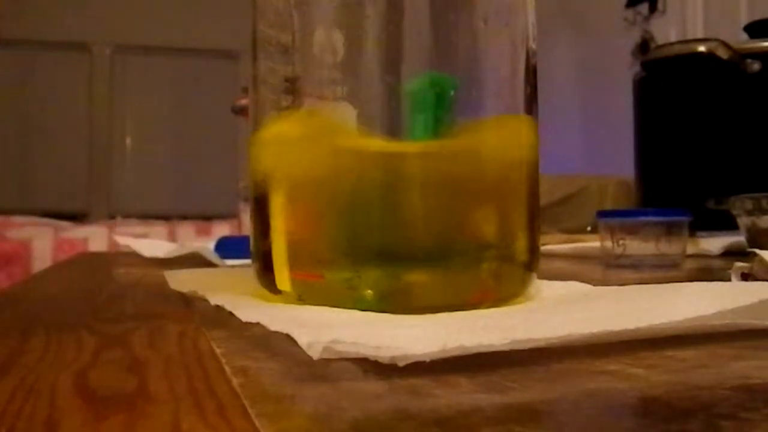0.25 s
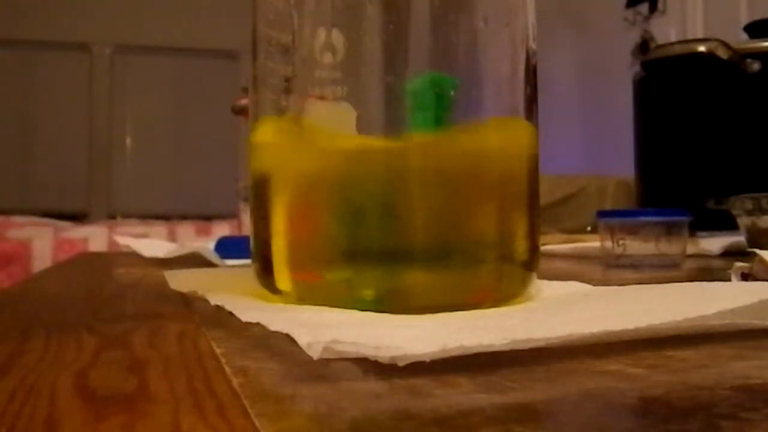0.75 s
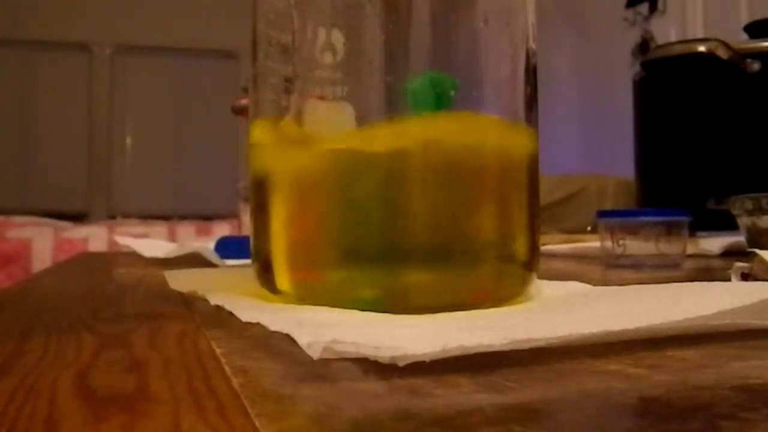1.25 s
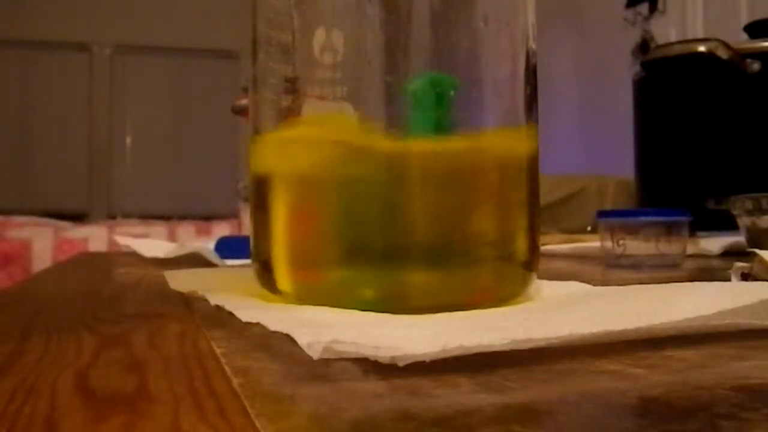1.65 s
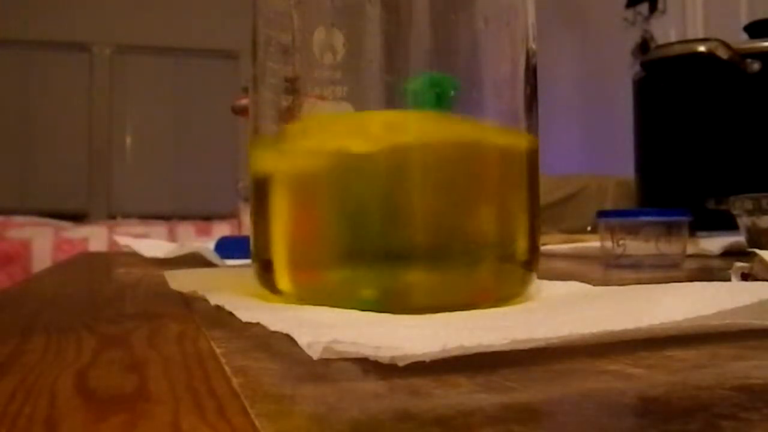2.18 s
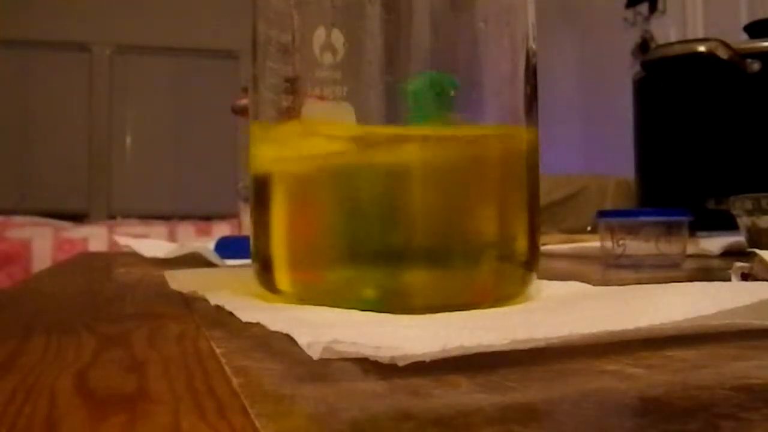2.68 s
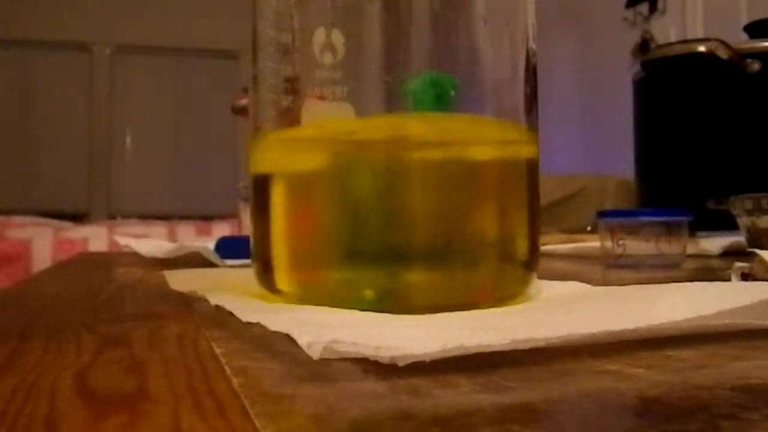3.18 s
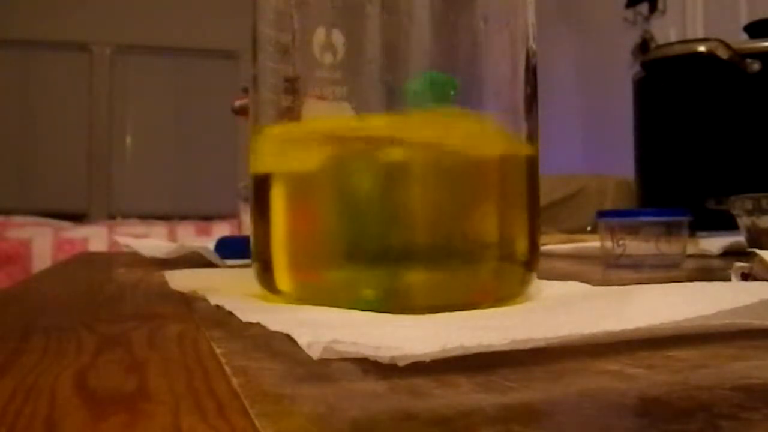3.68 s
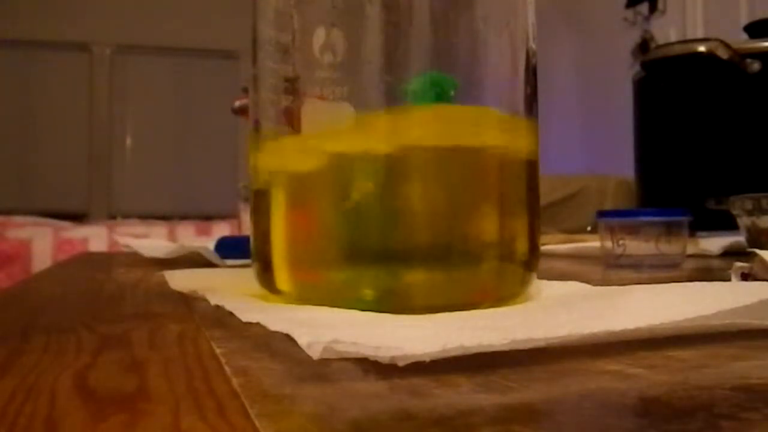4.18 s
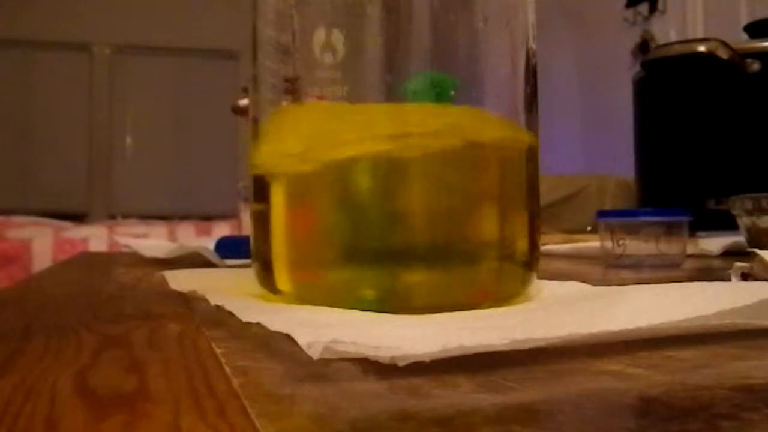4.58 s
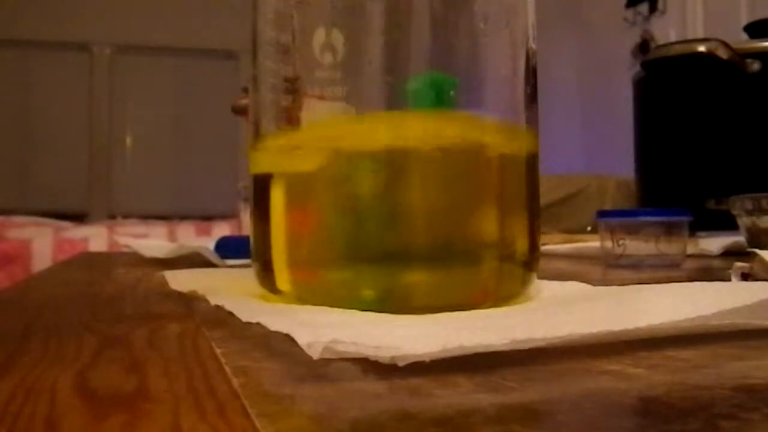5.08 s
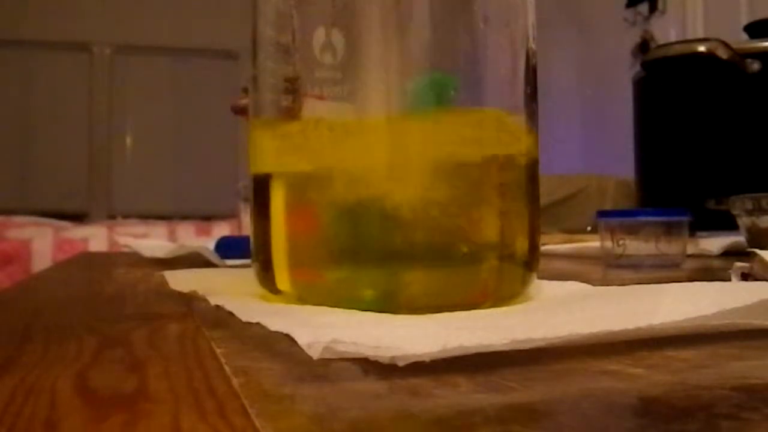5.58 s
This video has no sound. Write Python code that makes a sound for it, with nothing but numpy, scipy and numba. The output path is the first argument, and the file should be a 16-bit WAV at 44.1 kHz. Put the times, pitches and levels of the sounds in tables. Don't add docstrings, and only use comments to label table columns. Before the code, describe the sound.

A glass rod stirs a liquid-filled beaker, ringing out bright bell-like clinks about twice a second, then settling into plops, ticks and faint crackles.

```python
import sys
import numpy as np
from scipy import signal
from scipy.fft import rfft, irfft
from scipy.io import wavfile
from scipy.ndimage import uniform_filter1d, minimum_filter1d
from numba import njit

SR = 44100
rng = np.random.default_rng(int(sys.argv[2]) if len(sys.argv) > 2 else 0)


def decibels_to_gain(level_db):
    exponent = np.asarray(level_db, float) / 20
    return 10 ** exponent


def wav_out(sig):
    wavfile.write(sys.argv[1], SR, np.round(np.clip(np.atleast_2d(sig).T, -1, 1) * 32767).astype(np.int16))


N = 257544
TIME_S = np.arange(N) / SR
LEAD_S = 0.001
REST_HZ, FIRM_TREBLE_DB = 5745, -23.5

# lean to lower partners/dB,
# 3.1 kHz ring/dB, treble/dB
CLINKS = [(0.0197, -3, -14.5, -11.5, -21.5), (0.5135, -3, -13.5, -12, -25), (0.584, -16.5, 0.5, -24, -22.5),
          (0.956, -7, -1, -13.5, -17.5), (1.012, -9, -2.5, -7.5, -20.5), (1.4474, 0.5, -15.5, -11.5, -20.5),
          (1.499, -11.5, -4, -12, -19.5), (1.906, -1.5, -7, -13, -21), (1.931, -15, 0, -3, -17.5),
          (2.3479, -7, 6, -21.5, -15), (2.368, -17, -3, -7, -17), (2.7292, -9.5, -5, -8.5, -20.5),
          (3.2156, -5, -3, -11.5, -13), (3.2692, -22, 4, 1, -7.5), (3.4189, -14.5, -16, -1.5, -7),
          (3.4803, -14, -16, -12.5, -10), (3.5779, 0, -13, -14.5, -21.5), (3.6068, -24.5, 1, 0, -11),
          (3.9116, -17, -35.5, -28.5, -20), (4.2334, -28.5, -7.5, 13, 6), (4.3315, -7.5, 2.5, -8.5, -9),
          (4.3664, -16.5, 5, -10, -8.5), (4.5849, -28.5, -4.5, -11.5, -9.5), (4.7102, -10.5, 3, -16, -3)]
# t/s, loss while touching/dB, damping factor/1,
# relative 2.8 kHz ring/dB, relative 5.7 kHz ring/dB
CONTACT = [(0.017, 4, 1.19, -21.5, -12.5), (0.511, -0.5, 1.7, -25, -12), (.582, 6.5, 1.37, -19, -8),
           (.954, -1.5, 1.93, -23, -6.5), (1.013, 1.5, 1.65, -19, -29.5), (1.445, -0.5, 2.68, -36, -16),
           (1.502, -2, 1.21, -22, -8.5), (1.903, 2.5, 2.1, -47, -29.5), (1.930, 8, 1.19, -39, -12),
           (2.346, 22, 2.39, 0, -6), (2.372, -7, 1.27, -39.5, -17), (2.727, 5.5, 2.5, -25, -16),
           (3.214, 3, 1.71, -14, -4), (3.266, 9, 0.95, -38, 2), (3.416, -4, 0.6, -40, -13),
           (3.478, -3, 1.205, -54.5, -12.5), (3.576, 7.5, 2.23, -23, -10), (3.606, -2.5, 1.22, -20.5, 3),
           (3.91, 5.5, 1.09, -33, -22.5), (4.231, -8.5, 1.1, -17, -30), (4.329, 5, 3.6, -23, -7.5),
           (4.364, 3.5, 3.4, -38, -4), (4.583, 3.5, 1.08, -20, -14), (4.713, 6, 3.1, -20.5, 3)]
# t/s, extra 3.35 kHz/dB, extra 2.97 kHz/dB, extra 4.16 kHz/dB,
# extra treble damping/dB
SPOTS = [(.02, 7.5, 1.5, 1.5, 1.5), (.51, 9, -1, 0.5, -2), (.58, 3, 11, -2, -3), (.96, 7, 6, -6, -4),
         (1.01, 10, -4, -1, 2.5), (1.45, 2, -4, -2, 0), (1.5, 4, 2.5, 3.5, -2),
         (1.91, -3.5, -5.5, -0.5, 2.5), (1.93, -7.5, 1, -0.5, -4), (2.35, 3, 9.5, 0, -4),
         (2.37, 6, -7, 4.5, 1), (2.73, 4, -2.5, 8.5, -8), (3.21, 16, 1, 5.5, 1),
         (3.27, -2.5, 1.5, -1.5, -0.5), (3.42, -7.5, -2, -12.5, 4.5), (3.48, -2, -4.5, -3.5, 0.5),
         (3.58, 13.5, 4, 7.5, 4), (3.61, -4, 5, -0.5, 0.5), (3.91, 2, -7.5, 1, 0.5),
         (4.23, -12, 3.5, 1, 2.5), (4.33, -3, 3, 3.5, 3.5), (4.37, -4, 6.5, 0, -1), (4.59, 0, -4, 0, 3.5),
         (4.71, -5, 5, 1.5, 4.5)]
# t/s, peak level/dB, f/Hz
POPS = [(0.8326, -37, 2180), (0.9557, -25, 2170), (1.7703, -36.5, 2335), (1.9307, -26.5, 2340),
        (2.3465, -17.5, 2220), (2.5597, -37, 2202), (2.64, -37.5, 1862), (2.7646, -27, 2090),
        (3.2153, -28, 2362), (3.398, -29, 2530), (3.4212, -22.5, 2194), (3.5765, -24, 2563),
        (3.77, -45, 2264), (3.885, -51, 2220), (3.93, -54, 2585), (3.975, -50, 2620), (4.13, -42.5, 2195),
        (4.196, -37.5, 2358), (4.236, -32, 2120), (4.283, -38, 2240), (4.312, -43, 2300),
        (4.3289, -26.5, 2300), (4.465, -50, 2237), (4.525, -48, 2152), (4.555, -52.5, 2305),
        (4.5856, -26.5, 2170), (4.634, -32, 2230), (4.665, -42, 4607), (4.668, -33, 2330),
        (4.678, -47, 3633), (4.71, -21, 2268), (4.996, -35.5, 2214), (5.5226, -40, 2250),
        (5.555, -42, 2330), (5.695, -38, 2650)]


@njit
def ring(push, hz, loss):
    y, z = np.empty(len(push)), 0j
    for i in range(len(push)):
        z = z * np.exp(2j * np.pi * hz[i] / SR - loss[i]) + push[i]
        y[i] = z.imag
    return y


def curve(s, value):
    return np.interp(TIME_S, s, value)


def latest(s):
    return np.clip(np.searchsorted(s, TIME_S) - 1, 0, None)


def coloured(shape, lo_hz, hi_hz):
    hz = np.fft.rfftfreq(N, 1 / SR)
    f, db = np.transpose(shape)
    spec = rfft(rng.standard_normal(N)) * decibels_to_gain(np.interp(np.log(hz + 1), np.log(f), db))
    in_band = (hz > lo_hz) & (hz < hi_hz)
    return irfft(spec, N) * N / np.sqrt(2 * np.sum(abs(spec[in_band]) ** 2))


def blows(s, size):
    push = np.zeros(N, complex)
    push[(s * SR).astype(int)] = size
    return push


def fade(push, time_s):
    return signal.lfilter([1], [1, -np.exp(-1 / (time_s * SR))], push)


def walk(rate_hz):
    k = int(SR / rate_hz)
    held = np.repeat(rng.standard_normal(N // k + 1), k)
    return 1.2845 * uniform_filter1d(uniform_filter1d(held, k), k)[:N]


def thuds(table, glide, rise_s=0.00041, size=SR // 6):
    out, t = np.zeros(N + SR), np.arange(size) / SR
    for s, db, hz, t60_s in table:
        tone = np.sin(2 * np.pi * hz * (t + glide * t ** 2)) * np.exp(-np.log(1000) * t / t60_s)
        start = int(s * SR)
        out[start:start + size] += decibels_to_gain(db) * tone * (1 - np.exp(-t / rise_s))
    return out[:N]


def beaker():
    # t/s, upper 4 kHz ring level/dB, relative 3.1 kHz ring/dB, relative treble/dB
    ticks = [(0.7628, -51.5, 11.5, -28), (0.8338, -29.5, -14, -6), (1.1605, -31.5, -10, -19),
             (1.2179, -36.5, -13.5, -11.5), (1.716, -31.5, 0, -20.5), (1.7856, -37, -24.5, -7.5),
             (2.0162, -42.5, -17, -14), (2.3187, -20, -14, -38), (2.503, -61, -4, -18),
             (2.5621, -26.5, -5, -14.5), (2.668, -50, -7, -16), (2.694, -60.5, 28.5, 4),
             (2.88, -36.5, -13, -24), (2.9319, -43.5, -6, -13), (3.028, -49.5, -22, -5.5),
             (3.0725, -47, -22, -11), (3.888, -36.5, -32, 2.5), (4.0385, -59, -32, -15),
             (4.118, -39.5, -6, -12), (4.525, -50, 0, -19), (4.6668, -54, -26, -8), (4.959, -58, -25.5, 3),
             (5.0143, -61, -14.5, -3.5), (5.089, -64, -15.5, -5), (5.2269, -75.5, 11, 0.5),
             (5.3584, -66, 12, -8), (5.3905, -37, -34, -22), (5.547, -51.5, -16, -12),
             (5.661, -59.5, -5, 5.5), (5.6947, -50.5, 14, -8.5)]
    # t/s, level/dB, 3.1 kHz ring/dB, treble/dB
    grazes = [(1.102, -46, -10, -6), (1.313, -58, -5, -9), (1.52, -35, -15, -1), (1.546, -46, -15, -18),
              (2.59, -39.5, -15, -8), (2.829, -49, -13, -6.5), (2.976, -53, -11, -8.5),
              (4.008, -55, -30, 1), (4.186, -67, -11, 6), (4.534, -63, -10, -6), (4.94, -62.5, -13, 0),
              (5.199, -66, -0.5, -8), (5.302, -61, -3, 0), (5.78, -66, -10, -5), (5.82, -64, -9, -2)]
    touches = np.transpose(sorted(CLINKS + leaning(ticks)) + leaning(grazes))
    start, loud_db = touches[0] - LEAD_S, touches[1] + touches[4]
    return wall(strikes(touches, ticks + grazes)) + rod(start, loud_db) + crack(start, loud_db)


def leaning(ticks):
    return [(s, db, -2 + 0.65 * treble_db, middle_db, treble_db) for s, db, middle_db, treble_db in ticks]


def strikes(touches, ticks):
    # level/dB, share of the lean/1
    partners = [
        (-0.5, 0.83),
        (-12.5, 0.2),
        (0.2, 1.31),
    ]
    s, top_db, lean_db, middle_db, treble_db = touches
    firm, firm_db = np.transpose(CLINKS)[:2]
    tick, tick_db, _, tick_treble_db = np.transpose(ticks)
    slack_db, fifth_db = np.transpose(CONTACT)[3:]
    spot_db = np.zeros((4, len(s)))
    spot_db[:, np.isin(s, firm)] = np.transpose(SPOTS)[1:]
    lower_db, under_db, between_db = [top_db + db + share * lean_db for db, share in partners]
    start, firm_start = s - LEAD_S, firm - LEAD_S
    fifth_start = np.r_[firm, tick] - LEAD_S
    fifth_hit_db = np.r_[firm_db + fifth_db, tick_db + tick_treble_db - 6.5]
    return [(start, top_db), (start, lower_db),
            (start, top_db + middle_db), (start, top_db + middle_db + spot_db[0]),
            (firm_start, firm_db + slack_db), (start, top_db + treble_db + 2.5),
            (fifth_start, fifth_hit_db),
            (start, under_db + spot_db[1]), (start, between_db + spot_db[2]),
            (firm_start, firm_db + slack_db)]


def wall(hits):
    # f/Hz, level/dB, t60/s
    upper = [(4305.4, -1, 0.22), (4260, -7.5, 0.17), (4400, -43, 0.8)]
    lower = [(4101, -0.87, 0.25)]
    middle = [(3114, -3.5, 0.43), (3157, -9.5, 0.15)]
    flank = [(3350, -24, 0.4)]
    slack = [(2780, -8, .08)]
    treble = [(5460, -22, .14), (6020, -12, .2), (6280, -17, .12), (6890, -10, .1), (7050, -17, .13),
              (7500, -14, .11), (8310, -18, .09), (8730, -14, .12), (9450, -10, .12), (10260, -16, .11),
              (11130, -20, .11), (11710, -17, .19), (11880, -26, .24), (12920, -28, .32), (13500, -23, .08),
              (14130, -26, .08)]
    fifth = [(5745, 0.016, 0.21)]
    under = [(2967.4, -7.5, 0.43), (3010.4, -11.5, 0.67)]
    between = [(4168, -0.5, 0.19), (4123, -1, 0.19)]
    slack_high = [(5920, -4.5, 0.26)]
    # how far it follows the liquid/1, scatter from spot to spot/dB
    habits = [
        (1.8, 5),
        (0.1524, 1.7),
        (1.3, 4.5),
        (0.63, -3),
        (0.74, -1),
        (0.21, 5.5),
        (0.9, 2.5),
        (1.6, 4.5),
        (0.16, 1),
        (0.18, 4),
    ]
    families = (upper, lower, middle, flank, slack, treble, fifth, under, between, slack_high)
    at_once = 0.29
    shift, wobble_pct = slosh()
    damp, dull, touch = contact_loss()
    chance = rng.standard_normal((len(hits[0][0]), 2, 30))
    out, k = 0, 0
    for family, (at, hit_db), (wet, scatter_db) in zip(families, hits, habits):
        for mode_hz, db, t60_s in family:
            pitch_hz = mode_hz * (1 + wet * shift + wobble_pct / 100 * walk(35))
            level_db = hit_db + db + scatter_db * chance[:len(at), 0, k]
            loss = np.log(1000) * damp / (t60_s * SR)
            if family is treble:
                soft_db = 0.12 * np.minimum(hit_db - FIRM_TREBLE_DB, 0)
                level_db = level_db + soft_db * np.log2(mode_hz / REST_HZ)
                loss = loss * dull
            blow = blows(at, decibels_to_gain(level_db) * np.exp(.6j * chance[:len(at), 1, k]))
            feed_s = 0.0015 * min(1, 4360 / mode_hz) ** 2
            fed = fade(blow, feed_s) * (1 - np.exp(-1 / (feed_s * SR)))
            carrier = np.exp(2j * np.pi * np.cumsum(pitch_hz) / SR)
            push = ((1 - at_once) * fed + at_once * blow) * carrier
            out = out + ring(push, pitch_hz, loss + touch)
            k += 1
    return out


def slosh():
    # t/s, 5.7 kHz ring f/Hz, wobble/%
    liquid_path = [(0, 5745, 0.12), (0.511, 5755, 0.086), (0.948, 5760, 0.076), (1.5, 5728, 0.25),
                   (1.72, 5758, 0.22), (1.92, 5753, 0.24), (2.349, 5710, 0.31), (2.559, 5750, 0.2),
                   (2.732, 5750, 0.29), (3.211, 5727, 0.13), (3.481, 5737, 0.12), (3.578, 5709, 0.16),
                   (3.91, 5761, 0.2138), (4.228, 5691, 0.24), (4.329, 5740, 0.37), (4.73, 5760, 0.31),
                   (4.87, 5890, 0.27), (5.12, 5795, 0.14)]
    s, hz, wobble_pct = np.transpose(liquid_path)
    return curve(s, hz) / REST_HZ - 1, curve(s, wobble_pct)


def contact_loss():
    touch_s, settle_s = 0.024, 0.34
    s, touch_db, damp = np.transpose(CONTACT)[:3]
    last = latest(s)
    touch = fade(blows(s, np.maximum(touch_db, 0)).real, touch_s) * np.log(10) / (20 * touch_s * SR)
    calm = np.exp(-np.abs(TIME_S - s[last]) / settle_s)
    dull = decibels_to_gain(np.transpose(SPOTS)[-1])[last]
    return 1 + (damp[last] - 1) * calm, dull, touch


def rod(s, db):
    place = rng.random((len(s), 26, 2))
    height = place[..., 0]
    hz = 5500 * 2 ** (1.48 * height)
    tilt_db = -10 + 0.3 * np.minimum(db - FIRM_TREBLE_DB, 0)[:, None]
    level_db = db[:, None] - 17 + tilt_db * height + 9 * (place[..., 1] - .5)
    t60_s = 0.1 * (.5 + place[..., 1])
    return thuds(zip(np.repeat(s, 26), level_db.ravel(), hz.ravel(), t60_s.ravel()), glide=0)


def crack(s, db):
    # f/Hz, level/dB
    crack_shape = [(150, -34), (500, -22), (1500, -11), (2700, -0.5), (4200, -11), (5800, 4.5), (8000, -3),
                   (13500, -7), (16000, -28)]
    noise = coloured(crack_shape, 1000, 11000)
    high = signal.butter(2, 8500, 'high', fs=SR, output='sos')
    bright = signal.sosfilt(high, noise)
    loud = blows(s, decibels_to_gain(db)).real
    hard = blows(s, decibels_to_gain(db + 0.45 * np.minimum(db - FIRM_TREBLE_DB, 0))).real
    out = 0
    for level_db, decay_s in ((1.5, 0.0032), (-16.5, 0.011)):
        out = out + decibels_to_gain(level_db) * (noise * fade(loud, decay_s) + bright * fade(hard - loud, decay_s))
    return out


def bell():
    # t/s, upper mode level/dB, lower mode level/dB, upper f/Hz, t60/s
    bells = [(0.018, -34.5, -50.5, 1863, 1.7), (.512, -40, -38.5, 1865, 1.4), (.956, -30, -36, 1862, 1.5),
             (1.446, -40.5, -37.5, 1864, 2.1), (1.716, -44, -47, 1876, 2.1), (1.906, -40.5, -44, 1860, .35),
             (2.345, -43, -39.5, 1853, .6), (2.64, -58, -53.5, 1880, 1.1), (2.726, -42.5, -47, 1852, 1.3),
             (3.214, -28, -40, 1841, .55), (3.3, -47.5, -52, 1870, 1.1), (3.418, -49.5, -48, 1856, .6),
             (3.579, -34, -41.5, 1851, 1.5), (4.041, -54.5, -60.5, 1860, .55), (4.232, -46, -58, 1870, 1.2),
             (4.331, -44, -38, 1858, .8), (4.366, -47, -37, 1840, .9), (4.412, -56.5, -48.5, 1855, 1),
             (4.585, -51, -59.5, 1850, .8), (4.71, -32.5, -38.5, 1874, .45), (4.785, -53.5, -62, 1870, .1),
             (5.088, -60.5, -61, 1840, 1.1), (5.357, -42, -56, 1855, 1.1), (5.55, -61.5, -48, 1870, 1.5)]
    rise_s = 0.00043
    s, upper_db, lower_db, hz, t60_s = np.transpose(bells)
    last = latest(s)
    age_s = np.abs(TIME_S - s[last])
    out = 0
    for db, below_hz, t60_share in ((upper_db, 0, 1), (lower_db, 29, 0.8)):
        size = decibels_to_gain(db[last]) * np.exp(-np.log(1000) * age_s / (t60_share * t60_s[last])) * (TIME_S > s[0])
        pitch_hz = hz[last] - below_hz + 3 * walk(11)
        out = out + fade(size, rise_s) / (rise_s * SR) * np.sin(2 * np.pi * np.cumsum(pitch_hz) / SR)
    return out


def lingering():
    # t/s, peak level/dB, f/Hz, t60/s
    lingers = [(.03, -30, 3118, .7), (.03001, -35, 2975, .7), (.53, -32.5, 4160, 0.44), (.6, -38, 3000, 1),
               (1.05, -41, 3110, 0.88), (1.5, -33.5, 4160, 0.64), (4.119, -43, 3100, .4),
               (4.59, -40, 4330, .3), (4.725, -29, 3000, 0.23), (4.745, -43, 5850, 0.46),
               (4.75, -43, 4150, .5)]
    return thuds(lingers, glide=.012, rise_s=0.013, size=SR // 2)


def knocks():
    # t/s, peak level/dB, f/Hz, t60/s
    dull_knocks = [(3.9, -44, 1080, .1), (4.231, -31.5, 923, 0.11), (4.283, -38.5, 850, .08),
                   (4.312, -37, 880, .06), (4.33, -16, 892.3, 0.04), (4.366, -30, 966, 0.057),
                   (4.584, -39, 963, 0.058), (4.668, -41, 1031, 0.089), (4.711, -17, 1015, 0.06),
                   (4.994, -40.5, 1130, 0.1), (5.255, -37.5, 1051, 0.084), (5.305, -38.5, 1043, 0.055),
                   (5.361, -35.5, 1078, 0.061), (5.5232, -15.5, 884, 0.029), (5.5255, -18, 922, 0.07),
                   (5.548, -31, 950, 0.13), (5.665, -39, 1050, .06), (5.699, -35, 1067, 0.073),
                   (5.737, -39, 1070, 0.069), (5.82, -39, 1148, 0.059)]
    # t/s, peak level/dB, f/Hz, t60/s
    plops = [(1.447, -35, 1500, .03), (1.695, -46, 1520, .05), (2.346, -42, 534, 0.06),
             (2.347, -32, 1600, .025), (2.76, -41, 1600, .03), (3.142, -42, 506, 0.11),
             (3.425, -39, 524, 0.045), (3.576, -31, 450, 0.025), (3.577, -30, 1550, .03),
             (4.235, -39, 480, .05), (4.332, -36, 614, 0.05), (4.71, -35, 560, .03)]
    return thuds(dull_knocks + plops, glide=0.87)


def bubbles():
    # t/s, peak level/dB, f/Hz, t60/s
    drips = [
        (1.686, -37, 3385, 0.1),
        (2.0186, -19.5, 3157, 0.068),
        (2.6704, -35, 3293, 0.049),
        (3.95, -33.5, 3170, 0.038),
        (4.04, -32, 4032, 0.047),
        (4.129, -40, 4008, 0.046),
        (4.5246, -44.5, 3350, 0.05),
        (5.2255, -50, 3308, 0.043),
        (5.8262, -36, 3390, 0.042),
    ]
    return thuds(twinned(pops() + drips), glide=0.28, rise_s=.003)


def pops():
    s, db = np.transpose(CLINKS)[:2]
    hz = 2220 + 23 * rng.standard_normal(len(s))
    flicked = zip(s - LEAD_S, -28.5 + 0.43 * db, hz)
    return [(*row, 0.041) for row in [*flicked, *POPS]]


def twinned(table):
    return table + [(s + 0.0037, db - 9.5, hz * 0.96, t60_s) for s, db, hz, t60_s in table]


def spray():
    # f/Hz, level/dB
    spray_shape = [(800, -20), (2300, 0), (4500, -7), (8000, -30)]
    s, db = np.transpose(POPS)[:2]
    return coloured(spray_shape, 1000, 8000) * fade(blows(s, decibels_to_gain(db - 11)).real, 0.0047)


def crackle():
    # t/s, peak level/dB
    crackles = [(4.8794, -41), (4.9397, -49), (4.96, -42), (5.0144, -46), (5.0544, -46), (5.0792, -50.5),
                (5.1976, -46.5), (5.2244, -48), (5.2993, -48), (5.3581, -46), (5.5222, -38), (5.546, -36),
                (5.6607, -41), (5.695, -33.5), (5.7393, -39.5), (5.7794, -41), (5.8174, -44), (5.826, -39)]
    # f/Hz, level/dB
    crackle_shape = [(1200, -20), (2300, -3), (3600, -6), (4600, 3.5), (6200, -6), (9000, -15),
                     (15000, -31)]
    s, db = np.transpose(crackles)
    return coloured(crackle_shape, 2000, 7000) * fade(blows(s, decibels_to_gain(db - 11)).real, 0.0039)


def room(x):
    t60_s, gap_s, dull_hz = 0.39, 0.00083, 6960
    t = np.arange(SR // 2) / SR
    echo = rng.standard_normal(len(t)) * np.exp(-np.log(1000) * t / t60_s) * (t > gap_s)
    echo = fade(echo, 1 / (2 * np.pi * dull_hz))
    return x + decibels_to_gain(-19.5) * signal.fftconvolve(x, echo / np.sqrt(np.sum(echo ** 2)))[:N]


def kitchen():
    # f/Hz, level per Hz/dB
    rumble_shape = [(15, -37), (25, -11), (133, -4.5), (169, 0), (202, -3.5), (241, 0), (426, -11.5),
                    (534, -8.5), (638, -13), (670, -13), (726, -15), (1140, -12), (1200, -29), (1560, -44),
                    (2640, -120)]
    # f/Hz, level per Hz/dB
    hiss_shape = [(410, -19.5), (700, -12.5), (728, -13), (1170, -13.5), (1280, -7.5), (1520, -12),
                  (1920, -11), (2190, -14), (3100, -16.5), (3650, -21), (4300, -16), (4800, -20.5),
                  (5300, -26.5), (5920, -26.5), (15300, -35), (15900, -62)]
    # t/s, level/dB
    whine_path = [(0.0, -64), (1.27, -56), (1.35, -70.5), (2.1, -57), (2.54, -68.5), (2.86, -58),
                  (3.12, -68), (3.37, -57.5), (4.2, -73), (4.23, -54), (4.31, -57.5), (4.65, -60.5),
                  (4.73, -53.5), (5.84, -58)]
    gain_db = microphone_gain()
    hiss = coloured(hiss_shape, 1249, 1790) + decibels_to_gain(8) * np.sin(2 * np.pi * 1244.3 * TIME_S)
    rumble = coloured(rumble_shape, 120, 320)
    whine_db = curve(*np.transpose(whine_path)) + 2.5 + 3.5 * walk(13)
    whine = decibels_to_gain(whine_db) * np.sin(2 * np.pi * 685.3 * TIME_S)
    return decibels_to_gain(-54 + gain_db) * rumble + decibels_to_gain(-62.5 + 0.84 * gain_db) * hiss + whine


def microphone_gain():
    # t/s, room level it drops to/dB
    ducks = [(0, -54), (.02, -59.5), (0.51, -55.5), (.96, -52.5), (1.45, -57), (1.91, -55), (2.349, -60),
             (2.731, -55.5), (3.211, -54.5), (3.42, -51), (3.578, -63), (4.33, -61), (4.71, -59)]
    creep_db_per_s, lag_s = 12.5, 0.026
    s, db = np.transpose(ducks)
    last = latest(s)
    aim_db = db[last] + creep_db_per_s * (TIME_S - s[last]) - db[0]
    return fade(aim_db, lag_s) / (lag_s * SR)


def scene():
    glass = beaker() + bell() + lingering()
    liquid = bubbles() + knocks() + spray()
    return (room(glass + liquid) + kitchen() + crackle())[None]


def low_pass(x):
    return signal.sosfilt(signal.butter(12, 16450, fs=SR, output="sos"), x)


def record(dry):
    span = int(.0015 * SR)
    wanted = np.minimum(1, decibels_to_gain(0.1) / (abs(dry) + 1e-9))
    gain = uniform_filter1d(minimum_filter1d(wanted, span), span)
    lowpass = signal.ellip(8, .2, 70, 16300, fs=SR, output="sos")
    return low_pass(signal.sosfilt(lowpass, dry * gain))


dry = scene()
out = record(dry)
wav_out(out)
```